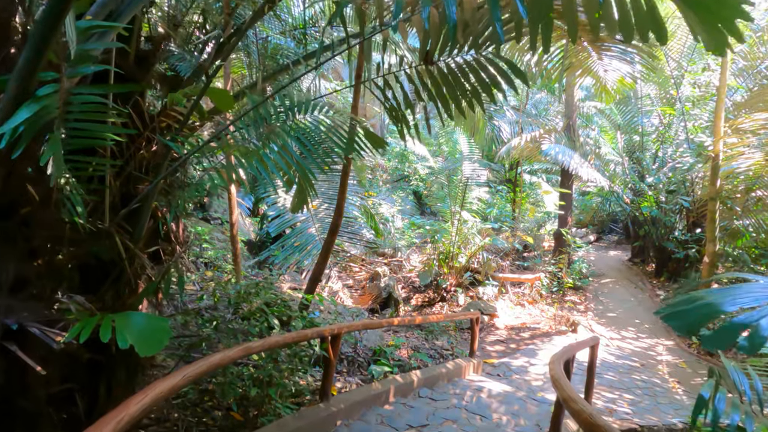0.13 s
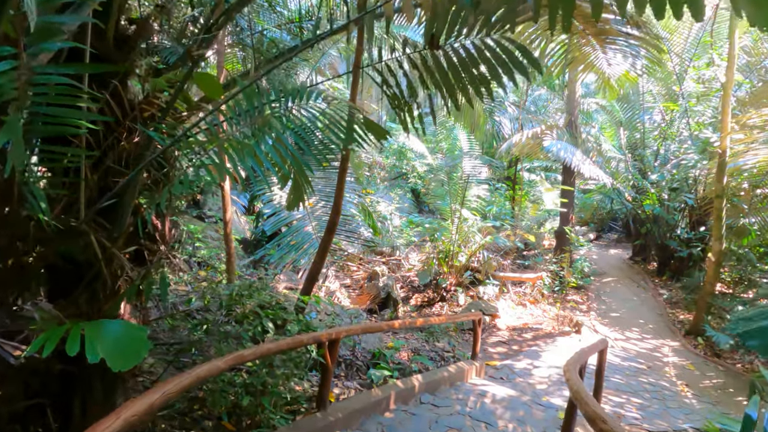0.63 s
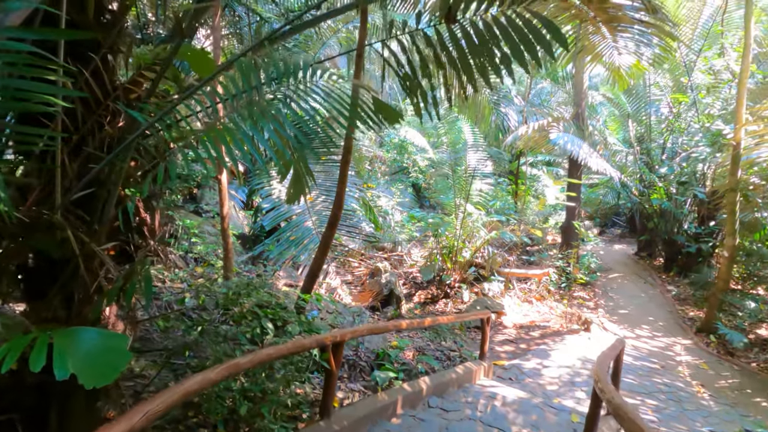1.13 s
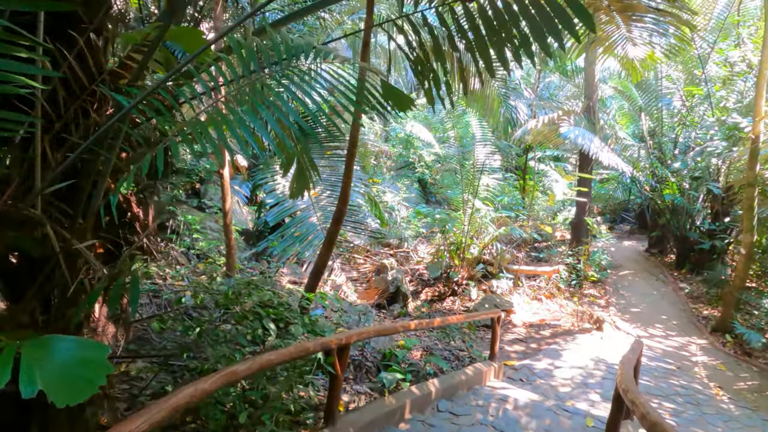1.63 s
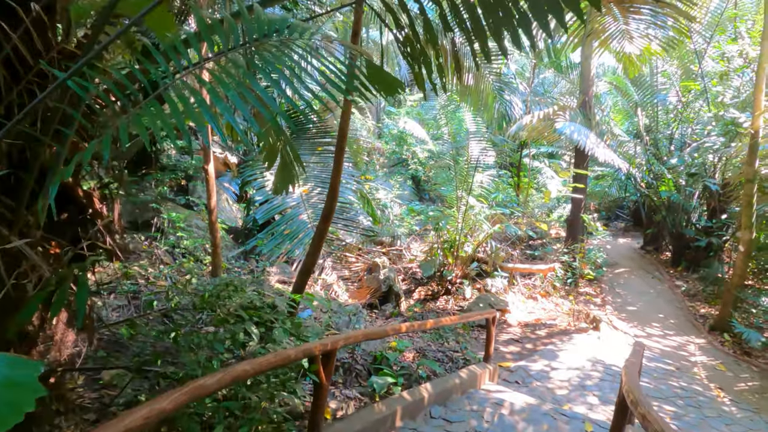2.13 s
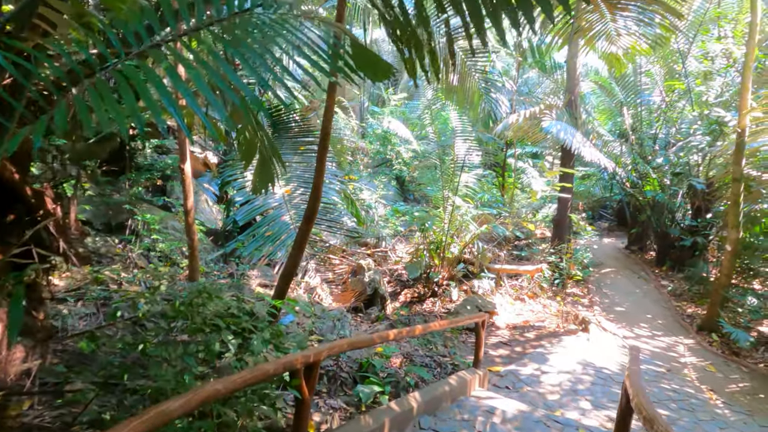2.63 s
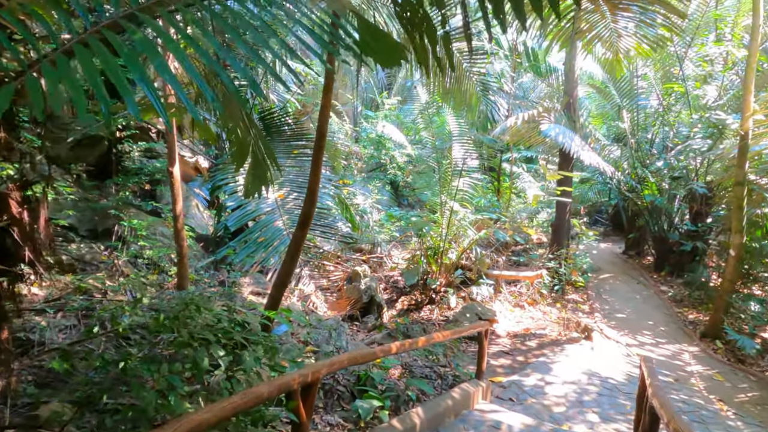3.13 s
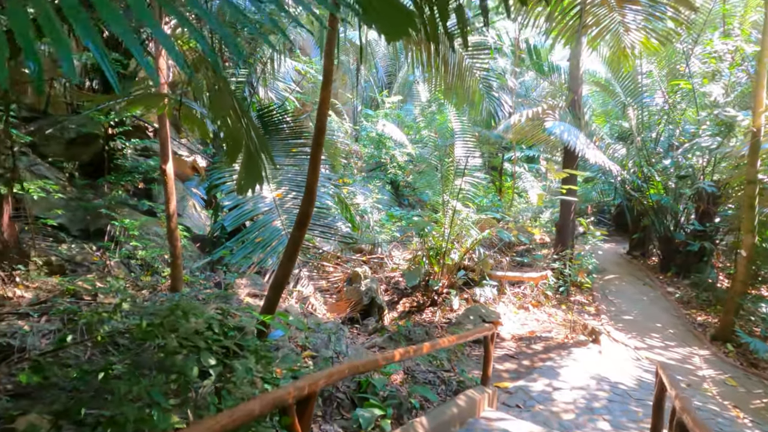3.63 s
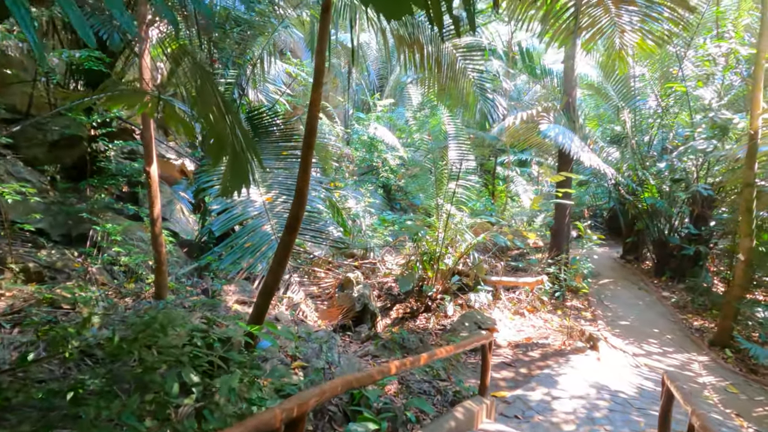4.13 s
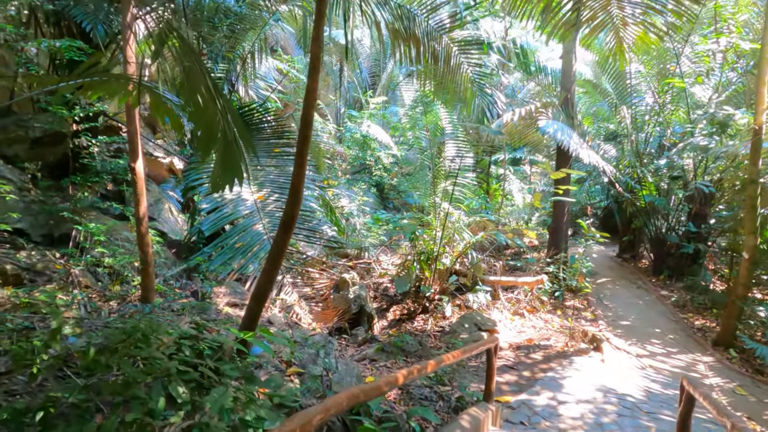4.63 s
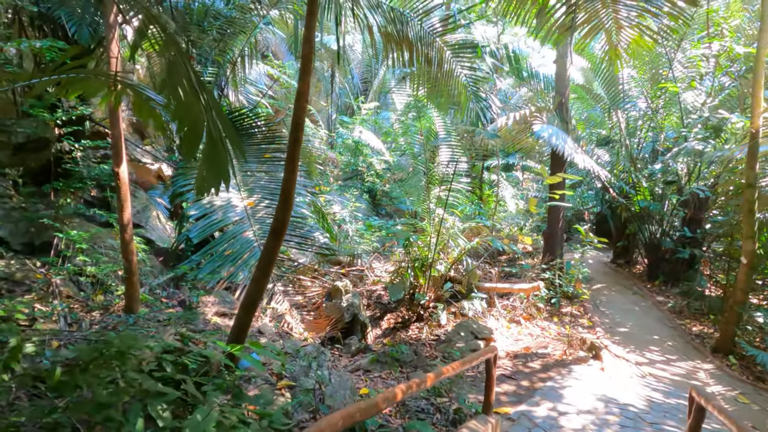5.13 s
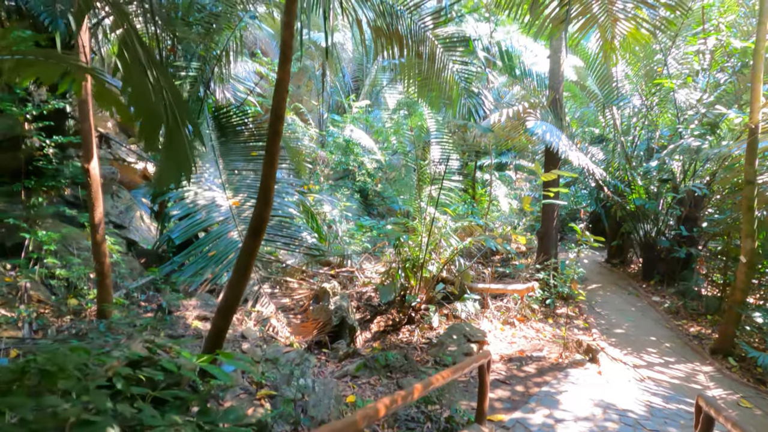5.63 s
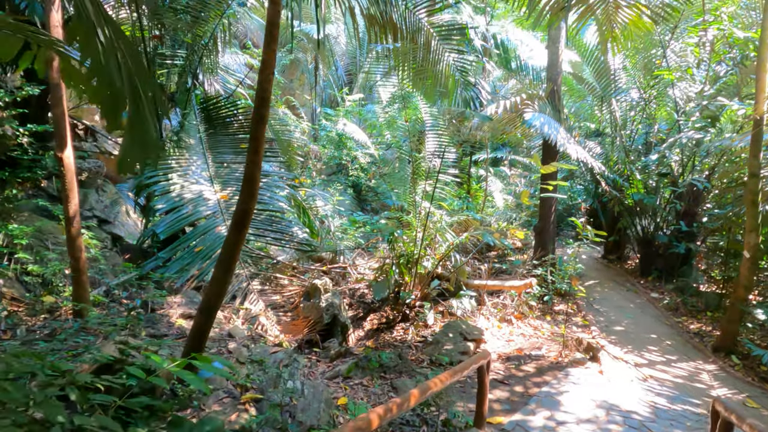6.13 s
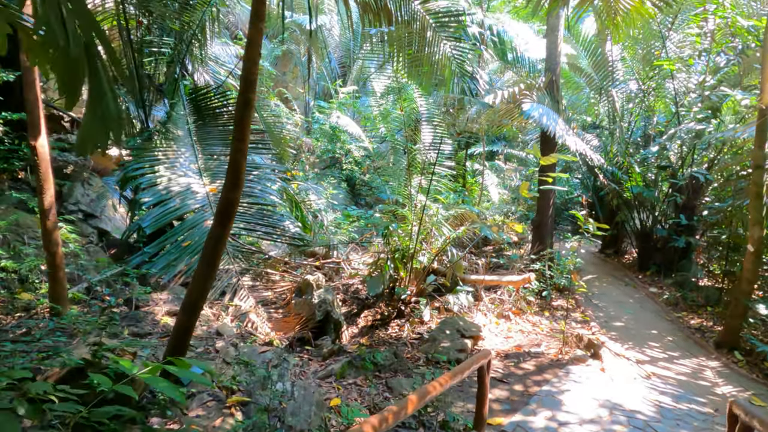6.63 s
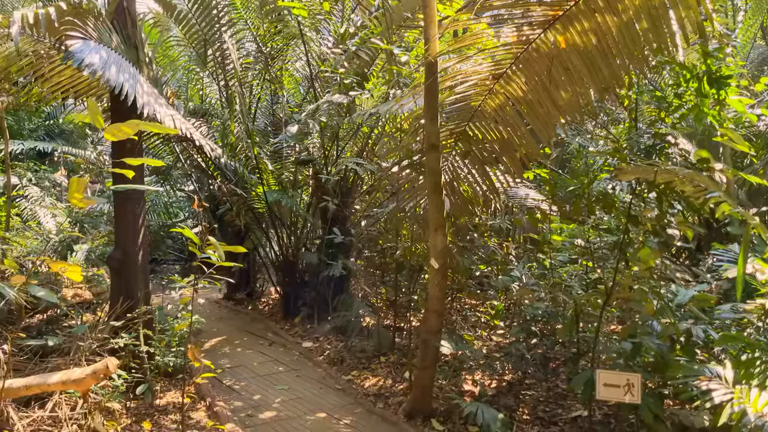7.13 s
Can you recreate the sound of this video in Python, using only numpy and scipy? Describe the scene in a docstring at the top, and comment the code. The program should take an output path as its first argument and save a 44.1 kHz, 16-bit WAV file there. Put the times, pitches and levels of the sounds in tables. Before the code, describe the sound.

A nearby bird fires loud, rapid runs of rising whistled notes while two walkers' shoes knock and scuff along a paved forest path.

```python
"""A near bird repeats runs of rising notes, each a short glide; another trills falling chips, far birds
whistle. Noise-like echo paths stand for trunks and leaves. Two walkers some metres apart on a paved forest path
each wear one microphone (left, right); filtered noise bursts make their shoes knock and scuff over shaped-noise
air. Late on the sound fades to silence and the scene changes: a quieter second part begins."""
import sys
import numpy as np
from scipy import signal
from scipy.fft import rfft, irfft
from scipy.io import wavfile
from scipy.ndimage import uniform_filter1d

SR = 44100
rng = np.random.default_rng(int(sys.argv[2]) if len(sys.argv) > 2 else 0)


def gain_from_db(level_db):
    """Turn a decibel level (scalar or array-like) into a linear amplitude factor."""
    decades = np.asarray(level_db, float) / 20
    return 10 ** decades


def to_wav(sig):
    """Store sig (one row per channel, or 1-D mono) as 16-bit WAV at the path in sys.argv[1].

    Samples outside -1..1 are clipped; the rate is SR.
    """
    pcm = np.clip(np.atleast_2d(sig), -1, 1) * 32767
    pcm = np.round(pcm).astype(np.int16)
    wavfile.write(sys.argv[1], SR, pcm.T)  # frames by channels


N = 320607
TIME = np.arange(N) / SR
FADE_FROM_S, SECOND_PART_S = 6.622, 6.668


def colour(x, points):
    """Shape a signal's spectrum by (Hz, dB) points."""
    hz, db = np.transpose(points)
    f = np.maximum(np.arange(N // 2 + 1) * SR / N, 1)
    gain_db = np.interp(np.log(f), np.log(hz), db)
    return irfft(rfft(x, N) * gain_from_db(gain_db), N)


def band(x, low_hz, high_hz):
    """Band-pass, scaled to peak 1."""
    y = signal.sosfilt(signal.butter(2, [low_hz, high_hz], "band", fs=SR, output="sos"), x)
    return y / np.abs(y).max()


def walk(rate_hz):
    """Random levels held 1 / rate_hz and slewed twice; spread near 1."""
    k = int(SR / rate_hz)
    held = np.repeat(rng.standard_normal(N // k + 1), k)
    return 1.29 * uniform_filter1d(uniform_filter1d(held, k), k)[:N]


def add(out, s, piece):
    """Mix a piece in at time s."""
    i = int(s * SR)
    out[i:i + len(piece)] += piece[:max(len(out) - i, 0)]


def chirp(start_hz, end_hz, length_s, bend, edge):
    """A whistled glide with a faint octave; bend > 1 slows it towards its end, a low edge makes it abrupt."""
    u = np.arange(int(length_s * SR)) / (length_s * SR)
    hz = end_hz + (start_hz - end_hz) * (1 - u) ** bend
    phase = 2 * np.pi * np.cumsum(hz) / SR
    envelope = np.sin(np.pi * u ** 1.05) ** edge
    return envelope * (np.sin(phase) + gain_from_db(-42) * np.sin(2 * phase))


def forest(x, lag_s, direct_db, early_db, tail_db, early_t60_s, tail_t60_s):
    """Direct path, scattered echoes off near trunks and a long leafy tail, all new as the walkers move on."""
    echoes_change_s = .33
    t = np.arange(int(1.2 * SR)) / SR
    hop, lag = int(echoes_change_s * SR), int(lag_s * SR)
    second = int((SECOND_PART_S + echoes_change_s) * SR)
    fade = np.hanning(2 * hop + 1)[:-1]
    x, out = np.r_[np.zeros(hop), x], np.zeros(N + hop)
    early = gain_from_db(early_db - 60 * t / early_t60_s) * np.clip(t / 0.0032, 0, 1) ** 2
    tail = gain_from_db(tail_db - 60 * t / tail_t60_s) * np.clip(t / 0.0063, 0, 1)
    for i in range(0, N + hop, hop):
        path = rng.standard_normal(len(t)) * np.hypot(early, tail) / np.sqrt(SR)
        path[0] = gain_from_db(direct_db)
        part = x[i:i + 2 * hop] * fade[:len(x) - i]
        late = np.arange(i, i + len(part)) >= second
        # nothing rings on into the second part
        for share, end in ((part * ~late, second), (part * late, len(x))):
            if share.any():
                add(out[:end], (i + lag + .5) / SR, signal.fftconvolve(share, path))
    return out[hop:]


def air():
    """Distant hum, leaves and microphone hiss, unrelated left and right; low and high parts waver apart."""
    # Spectra of the first and second part. Each row: frequency in Hz, density in dB per Hz (relative).
    first_air = [(15, -35.5), (25, -19), (48, -1), (149, 2), (489, -6), (936, -13), (1330, -12),
                 (1650, -10), (1940, -9), (2550, -6), (3520, -7.5), (4250, -16), (14400, -29), (16000, -29)]
    second_air = [(15, -48.5), (25, -19), (82, -1), (145, -12), (373, -3.5), (489, -15.5), (754, -5.5),
                  (962, -12.5), (1940, -5.5), (2160, 3), (4140, -8.5), (6560, -5), (7310, -21),
                  (16000, -32)]
    # Spectral tilt between sides, ahead of levelling. Each row: frequency in Hz, left minus right in dB.
    side_tilt = [(60, -9), (500, -10), (3000, -10), (12000, -8)]
    first_rms_db, second_rms_db = -42, -59
    out = []
    for sign in (1, -1):
        parts = []
        for points, rms_db in ((first_air, first_rms_db), (second_air, second_rms_db)):
            hiss = colour(rng.standard_normal(N), points)
            hiss = colour(hiss, [(f, sign * d / 2) for f, d in side_tilt])
            low = signal.lfilter(*signal.butter(2, 2000, fs=SR), hiss)
            hiss = low * gain_from_db(2.5 * walk(6)) + (hiss - low) * gain_from_db(0.25 * walk(4.2))
            parts.append(hiss * gain_from_db(rms_db) / hiss.std())
        out.append(np.where(TIME > SECOND_PART_S, parts[1], parts[0]))
    return np.array(out)


def far_birds():
    """Pure gliding whistles that flutter a little, and fainter chatter from all round, smeared by distance."""
    # Each row: start in seconds, length in seconds, start pitch in Hz, end pitch in Hz,
    # level in dB, left minus right in dB (both ahead of waver and echoes).
    whistle_rows = [(0, 0.13, 2550, 2154, -45, -13), (0, 0.069, 1754, 1940, -54.5, -9),
                    (.01, 0.068, 3400, 4290, -46.5, -4), (.34, 0.13, 2900, 2736, -43, -6),
                    (0.524, 0.11, 2780, 2774, -55.5, -20), (1.18, 0.11, 1840, 1774, -46.5, -7),
                    (1.395, 0.095, 1830, 2000, -47, -6), (1.643, 0.11, 2380, 2102, -39, -4),
                    (2.529, 0.036, 2200, 2460, -40, -2), (2.732, 0.19, 2700, 2530, -47.5, -7.5),
                    (3.192, 0.13, 2720, 2690, -53.5, -19), (3.328, 0.1, 2200, 2484, -40, 0),
                    (3.39, 0.046, 2900, 3550, -47.5, -10), (3.545, 0.043, 2500, 2110, -32.5, -1),
                    (3.582, .05, 2050, 2047, -35.5, -7), (3.625, 0.065, 2200, 2560, -32, 2),
                    (3.706, 0.054, 2500, 2305, -31, -5), (3.748, 0.058, 2850, 2500, -29.5, 3),
                    (4.002, 0.0596, 1742, 2012, -35.5, 4.5), (4.057, 0.032, 1800, 1805, -38, 2),
                    (4.08, 0.053, 2100, 3060, -32.5, -9), (4.103, 0.058, 2700, 2510, -27.5, -1),
                    (4.349, 0.06, 2520, 2205, -39.5, -15), (4.435, 0.049, 2495, 2600, -37, -6),
                    (4.5, 0.052, 2557, 2442, -32.5, -1.5), (4.55, 0.049, 2760, 2060, -42, -19),
                    (4.6, 0.043, 2558, 2477, -38, -7.5), (5.666, .04, 2100, 2110, -41, -3.5),
                    (5.735, 0.063, 2620, 2400, -35, -1), (5.805, .07, 2300, 2484, -38, 0.5),
                    (5.985, 0.047, 2830, 2704, -43.5, 1), (6.294, 0.093, 2040, 1873, -40, -1.5),
                    (6.404, .06, 1900, 2210, -36.5, -2), (6.46, 0.064, 2280, 2236, -41.5, -2.5),
                    (6.561, 0.065, 2250, 2274, -47.5, -2.5), (6.689, 0.057, 1900, 2170, -56.5, 8),
                    (6.81, .14, 800, 677, -68, -6), (6.943, 0.051, 2404, 2215, -43.5, -6),
                    (6.977, 0.033, 2150, 1906, -42, -3), (7.04, 0.068, 2502, 2382, -38, -5),
                    (7.125, 0.044, 2050, 1805, -47.5, -8), (7.166, .04, 2930, 2780, -37.5, -2),
                    (7.206, 0.053, 2895, 2673, -44.5, 6)]
    flutter_share = .018  # of pitch
    falling_fade_db, falling_bend = -6.5, 1.617
    rising_soft_start_db, rising_bend = -6, 2.8
    voice, flutter = np.zeros((2, N)), walk(70)
    for s, length_s, start_hz, end_hz, db, pan_db in whistle_rows:
        t = np.arange(0, length_s, 1 / SR)
        u = t / length_s
        # rising notes start soft and reach their pitch early; falling notes die away
        if end_hz > start_hz:
            left = (1 - u) ** rising_bend
            shape_db = rising_soft_start_db * left
        else:
            left = (1 - u) ** falling_bend
            shape_db = falling_fade_db * u
        hz = end_hz + (start_hz - end_hz) * left
        hz = hz * (1 + flutter_share * np.interp(s + t, TIME, flutter))
        ramps = np.clip(np.minimum(t, length_s - t) / 0.0036, 0, 1)
        tone = np.sin(2 * np.pi * np.cumsum(hz) / SR) * ramps
        for side, sign in zip(voice, (1, -1)):
            add(side, max(s, 0), tone * gain_from_db(db + shape_db + sign * pan_db / 2))
    # moving leaves in the way make the far notes waver
    voice = voice * gain_from_db(3.5 * np.array([walk(60), walk(60)]))
    for when, pitch, glide, size, side in rng.random((160, 5)):
        hz = 1900 + 1900 * pitch
        chatter = chirp(hz, hz * (1.2 + 0.37 * glide), 0.1, 1.4, 0.64)
        add(voice[int(side > .5)], when * FADE_FROM_S, gain_from_db(-65.5 + 4.3 * size) * chatter)
    left = forest(voice[0], 0, 1.7, 5.5, 10, .3, 0.85)
    right = forest(voice[1], .02, -2.0, 13.6, 12.8, 0.077, 0.98)
    return np.array([left, right])


def to_walkers(own, across_db):
    """Each microphone hears its own shoes, and the other pair later, weaker and duller."""
    walkers_apart_s = 0.027
    delayed = np.roll(own[::-1], int(walkers_apart_s * SR), axis=1)
    across = signal.lfilter(*signal.butter(1, 2500, fs=SR), delayed)
    return own + gain_from_db(across_db) * across


def steps():
    """A short uneven push rings the sole and thuds into the ground; a click marks the first touch."""
    # Shoe on paving, left walker then right. Each row: start in seconds, level in dB, ring in Hz,
    # click over ring in dB.
    step_rows = [
        [(0.069, -22.5, 1210, -20), (0.155, -26.5, 664, -15), (0.237, -29, 850, -15), (0.36, -15, 720, -27),
         (0.854, -20.5, 1280, -21), (1.183, -26, 412, -9), (1.701, -16, 820, -4), (1.758, -29.5, 680, -15),
         (1.866, -25, 734, -16), (2.039, -22.5, 1030, -33), (2.605, -26.5, 966, -18), (2.814, -31, 780, -15),
         (2.969, -20.5, 470, -22), (3.475, -22, 897, -33), (3.531, -28.5, 716, -10.5), (3.76, -16, 474, -5),
         (4.39, -38, 307, 11), (4.413, -25.5, 1360, -13), (4.676, -22, 658, -23), (5.419, -22, 1222, -19),
         (5.641, -21, 660, -11), (6.171, -23, 1060, -13), (6.211, -26, 1080, -13), (6.256, -18.5, 523, -17),
         (6.297, -26.5, 490, -23), (6.503, -20.5, 740, -31), (7.025, -51, 400, -15)],
        [(0.141, -31, 816, 3), (0.213, -31, 600, 4.5), (0.306, -26, 460, -22), (0.952, -32.5, 296, 9),
         (1.375, -32, 500, 8), (1.399, -21, 1760, -12), (1.534, -35, 298, 1), (1.897, -29, 500, -8),
         (2.073, -30.5, 318, -20), (2.35, -29.5, 1480, -16), (2.492, -24, 622, -1.5), (2.57, -27.5, 1450, -16),
         (3.087, -29, 1430, -15), (3.17, -30, 294, 2.5), (4.363, -28.5, 474, 0), (4.414, -24, 1320, -18.5),
         (4.444, -24.5, 1510, -17), (5.002, -39, 314, 6), (5.022, -25.5, 1420, -21), (5.182, -32.5, 754, -22),
         (5.566, -37.5, 260, 9.5), (5.662, -31.5, 325, -10.5), (6.023, -32.5, 1430, -15), (6.38, -33.5, 452, 2),
         (7.025, -44.5, 400, -15)],
    ]
    light_per_s = 2
    own = np.zeros((2, N))
    t = np.arange(int(.08 * SR)) / SR
    for side, rows in zip(own, step_rows):
        # light touches of heel and toe at random times
        light = [(when * FADE_FROM_S, -42 + 5 * size, 300 + 350 * pitch, -12)
                 for when, size, pitch in rng.random((int(light_per_s * FADE_FROM_S), 3))]
        for s, db, hz, click_db in [*rows, *light]:
            chance = rng.standard_normal((3, len(t)))
            push = chance[0] * np.exp(-t / 0.0032) * np.clip(t / 0.00092, 0, 1)
            push = push + 0.15 * chance[1] ** 3 * np.exp(-t / 0.0091)
            ring = band(push, hz / 1.99, hz * 1.333)
            thud = gain_from_db(-8.5) * band(push, 126, 433)
            click = gain_from_db(click_db) * band(chance[2] * np.exp(-t / 0.0029), 830, 3600)
            add(side, s, gain_from_db(db + 4.5) * (ring + thud + click))
    heard = to_walkers(own, -12.5)
    return np.array([forest(side, 0, 0.15, 1.8, -9.0, 0.061, 0.54) for side in heard])


def scuffs():
    """Soles scuff grit (left) and leaf litter (right): bursts of tiny grains of uneven size."""
    # Left then right. Each row: start in seconds, level in dB, decay in seconds (2 ms at least).
    scuff_rows = [
        [(0.1552, -20, 0.0064), (0.221, -29.5, 0.017), (0.3604, -27.5, 0.03), (1.1842, -27.5, 0.032),
         (2.0384, -26.5, 0.033), (2.97, -23, 0.014), (3.4717, -28.5, 0.016), (3.5189, -30, 0.022),
         (3.5525, -17, 0.011), (3.566, -31.5, 0.026), (3.7593, -23, 0.022), (4.3904, -34, 0.014),
         (4.4205, -26, 0.03), (4.4697, -32, 0.067), (4.6744, -25.5, 0.026), (5.599, -33.5, 0.04),
         (5.6416, -28.5, 0.024), (5.8526, -23, 0.01), (6.254, -29, 0.018), (6.5031, -33.5, 0.044),
         (7.0988, -37.5, 0.021)],
        [(.215, -32.5, 0.027), (.28, -32.5, 0.11), (.78, -34, 0.054), (0.871, -35.5, 0.11),
         (1.379, -33.5, 0.24), (1.889, -33, 0.12), (3.07, -33, 0.0153), (3.15, -27.5, 0.029), (3.74, -29, 0.11),
         (4.369, -32.5, 0.17), (5.0, -33, 0.17), (5.65, -35, 0.11), (6.27, -34.5, 0.063), (7.01, -49, 0.0059),
         (7.1, -38.5, 0.023)],
    ]
    # Spectra. Each row: frequency in Hz, density in dB per Hz (relative).
    grit_spectrum = [(800, -4), (2000, -0.5), (4000, -2.5), (7000, -5.5), (11000, -12.5), (16000, -29.5)]
    litter_spectrum = [(150, 1.5), (500, 4), (1500, 5), (3000, 6.5), (7000, -13.5), (16000, -26.5)]
    swell = np.zeros((2, N))
    t = np.arange(int(.4 * SR)) / SR
    for side, rows in zip(swell, scuff_rows):
        for s, db, decay_s in rows:
            burst = np.clip(t / 0.00048, 0, 1) * np.exp(-t / max(decay_s, .002))
            add(side, s, gain_from_db(db - 4.5) * burst)
    grains = rng.standard_normal((2, N)) * gain_from_db(1.6 * rng.exponential(size=(2, N)) + 2.5)
    grains = grains * gain_from_db(3.84 * walk(120)) * swell
    own = np.array([colour(grains[0], grit_spectrum), colour(grains[1], litter_spectrum)])
    return to_walkers(own, -11.0)


def trilling_bird():
    """Fast falling chips fade towards their low end, start lower as a trill goes on, reach the right first."""
    # Each row: start at the left walker in seconds, chips (rounded), first gap in seconds, level in dB,
    # start pitch in Hz, sinking in Hz per second.
    trill_rows = [(0.385, 20, .0566, -26, 5645, 630), (3.795, 13.1, .0562, -24, 5470, 953)]
    slowing_s = (.0002, .00037)  # per trill; each gap is longer by twice this
    fade_db_per_s = -2.5
    voice = np.zeros(N)
    for (first_s, count, gap_s, db, top_hz, sink_hz_per_s), slow_s in zip(trill_rows, slowing_s):
        k = np.arange(round(count))
        for since_s, chance in zip(gap_s * k + slow_s * k ** 2, rng.standard_normal(len(k))):
            chip = chirp(top_hz - sink_hz_per_s * since_s, 3300, .022, .85, .7)
            chip = chip * gain_from_db(np.linspace(6.5, -17.5, len(chip)))
            chip_db = db + fade_db_per_s * since_s + 0.91 * chance
            add(voice, first_s + since_s - .012, gain_from_db(chip_db) * chip)
    # the bird turns to face the left walker for its second trill
    turn_db = np.where(TIME > 3, -5.5, 1.5)
    left = forest(voice, 0.013, -2.0, 7.6, 11.4, 1.0, 0.92)
    right = forest(voice * gain_from_db(turn_db), 0, -0.5, 17.3, 11.8, 0.47, 1.0)
    return np.array([left, right])


def near_bird():
    """Runs of rising notes and a few sharp chips: direct on the right, mostly scattered and later on the left."""
    # Each row: first note in seconds, last note in seconds, level in dB, ceiling in Hz,
    # accented note (from 0), swell in dB per note before it.
    run_rows = [(.784, 1.039, -8.5, 4117, 3, 8.5), (1.217, 1.471, -8.5, 4070, 2, 13),
                (1.675, 1.945, -9, 4069, 2, 8), (2.171, 2.439, -9, 4035, 2, 8.5),
                (4.113, 4.378, -8.5, 4070, 2, 6.5), (4.601, 4.867, -8.5, 3996, 3, 8),
                (5.108, 5.374, -8, 3976, 3, 6)]
    # Each row: start in seconds, level in dB.
    chip_rows = [(5.872, -26.5), (6.094, -25), (6.335, -29.5), (6.594, -27), (7.013, -42)]
    run_notes, slowing_share = 9, .14  # early notes crowd together by this share
    first_below_hz, climb_notes = 1450, 3.158  # the pitch closes in on the ceiling
    narrow_scoop_hz, scoop_hz_per_note, wide_scoop_hz = 118, 191.5, 780
    widen_after_notes = 0.67  # scoops widen this long after the accent
    after_accent_db, tiring_db_per_note = -4.5, -0.04
    voice = np.zeros(N)
    k = np.arange(run_notes)
    u = k / k[-1]
    for first_s, last_s, db, ceiling_hz, accent, swell_db in run_rows:
        chance = rng.standard_normal((2, run_notes))
        times_s = first_s + (last_s - first_s) * (u - slowing_share * u * (1 - u))
        end_hz = ceiling_hz - first_below_hz * np.exp(-k / climb_notes)
        end_hz = end_hz * (1 + 0.0083 * chance[0])
        since = k - accent
        scoop_hz = narrow_scoop_hz + scoop_hz_per_note * (since - widen_after_notes)
        scoop_hz = np.clip(scoop_hz, narrow_scoop_hz, wide_scoop_hz)
        # the voice swells up to the accent, and the note after it is weaker
        level_db = db + swell_db * np.minimum(since, 0) + after_accent_db * (since == 1)
        level_db = level_db + tiring_db_per_note * k + 1.2 * chance[1]
        for s, top_hz, rise_hz, note_db in zip(times_s, end_hz, scoop_hz, level_db):
            # each note scoops up from below its steady climb
            note = chirp(top_hz - 1.1 * rise_hz, top_hz, .0195, 1.9, .6)
            add(voice, s - .001, gain_from_db(note_db) * note)
    for s, db in chip_rows:
        # a close echo repeats each chip 8 ms later, 4 dB weaker
        chip = chirp(2900, 3950, .007, 1.2, .7)
        add(voice, s - .003, gain_from_db(db) * chip)
        add(voice, s + 0.0052, gain_from_db(db - 4.0) * chip)
    right = forest(voice, 0, -2, 10.5, 5.5, .3, .8)
    left = forest(voice, 0.015, -15, 2.1, 1.9, 0.4, 0.88)
    return np.array([left, right])


def bumps():
    """Something knocks the left microphone itself: a dull swing with a tick, unheard on the right."""
    # Each row: start in seconds, level in dB, swing in Hz, tick over swing in dB.
    bump_rows = [(5.748, -26.5, 220, -5), (5.871, -22, 236, 1), (5.881, -10, 290, 1.5),
                 (5.895, -20, 234, -0.5), (6.068, -25, 260, 2), (6.129, -25.5, 262, -33)]
    out = np.zeros((2, N))
    t = np.arange(int(.1 * SR)) / SR
    for s, db, hz, tick_db in bump_rows:
        chance = rng.standard_normal((2, len(t)))
        swing = band(chance[0] * np.exp(-t / 0.012), hz / 3, hz * 1.16)
        tick = band(chance[1] * np.exp(-t / 0.0027), 910, 2370)
        add(out[0], s, gain_from_db(db + 6) * (swing + gain_from_db(tick_db) * tick))
    return out


def scene():
    """All sources at the two microphones."""
    return near_bird() + trilling_bird() + far_birds() + steps() + bumps() + scuffs() + air()


def roll_off(x):
    """The treble ends steeply here."""
    return signal.sosfilt(signal.butter(12, 16500, fs=SR, output="sos"), x)


def record(dry):
    """The sound fades to a faint dull remnant, falls silent, then a quieter second part begins; the top is cut."""
    silent_from_s, top_hz = 6.638, 15850
    dull = signal.lfilter(*signal.butter(6, 4000, fs=SR), dry)
    remnant = gain_from_db(-22) * dull * np.clip((silent_from_s - TIME) / 0.014, 0, 1)
    x = np.where((TIME > FADE_FROM_S) & (TIME < SECOND_PART_S), remnant, dry)
    x = signal.sosfilt(signal.ellip(10, .2, 80, top_hz, fs=SR, output="sos"), x)
    return roll_off(x)


dry = scene()
out = record(dry)
to_wav(out)
```